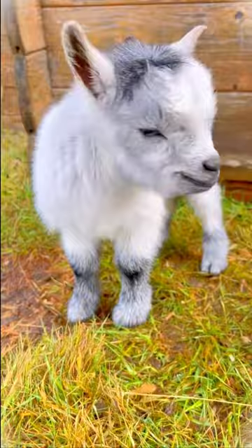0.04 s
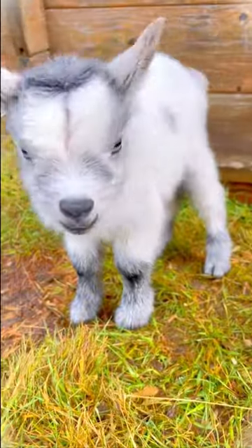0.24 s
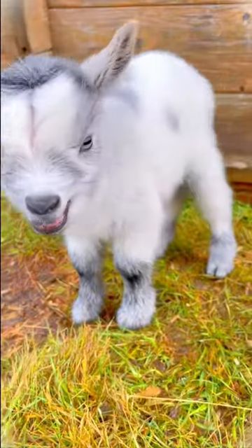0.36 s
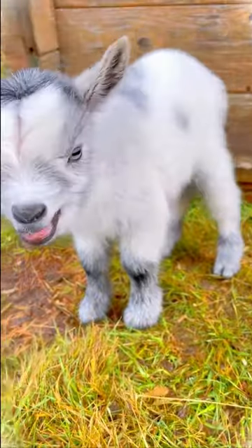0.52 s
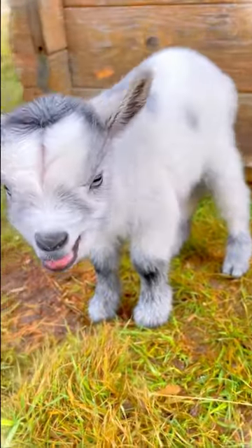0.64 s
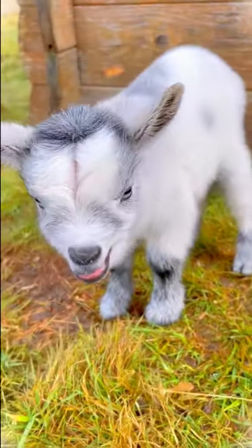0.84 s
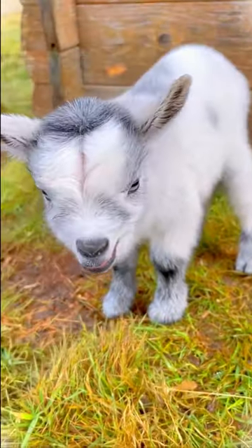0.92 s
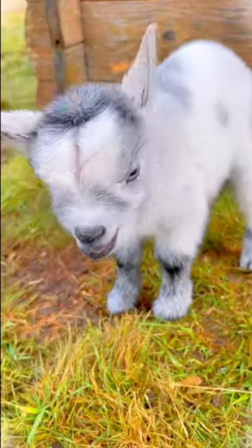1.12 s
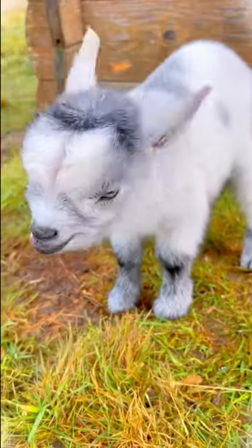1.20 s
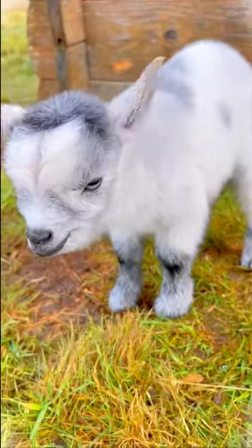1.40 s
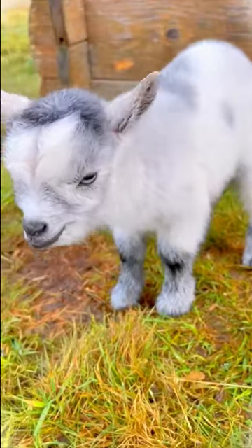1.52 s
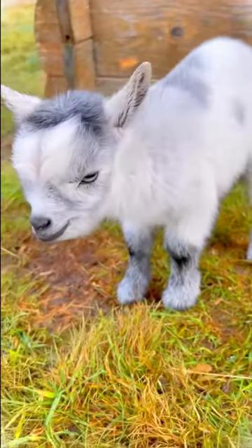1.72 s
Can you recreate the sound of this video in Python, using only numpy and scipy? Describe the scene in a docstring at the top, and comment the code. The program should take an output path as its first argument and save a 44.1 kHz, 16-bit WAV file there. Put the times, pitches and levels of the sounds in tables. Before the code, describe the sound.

A goat kid bleats once, close to the microphone outdoors, a high, raspy note that wavers four times. Light wind buffets the microphone over a faint hiss, then eases, and three soft rustles follow.

```python
"""A goat kid bleats once, close to a phone outdoors.
After a moment of silence, light wind buffets the microphone over a faint hiss.
From 0.43 to 0.96 s the kid's vocal folds pulse out one high, raspy note that throbs four times:
each throb is a clear stack of harmonics that sags in pitch; between throbs the voice breaks into rasp.
The wind then eases, and from 1.5 s come three light rustles, probably of grass underfoot."""
import sys
import numpy as np
from scipy import signal
from scipy.fft import rfft, irfft
from scipy.io import wavfile
from scipy.ndimage import uniform_filter1d

SR = 44100
rng = np.random.default_rng(int(sys.argv[2]) if len(sys.argv) > 2 else 0)


def dump(signal):
    """Clip the signal to [-1, 1] and save it as 16-bit WAV at the path in sys.argv[1]."""
    limited = np.clip(np.atleast_2d(signal).T, -1, 1)
    pcm = np.round(limited * 32767).astype(np.int16)
    wavfile.write(sys.argv[1], SR, pcm)


N = 77175
BINS_HZ = np.fft.rfftfreq(N, 1 / SR)
SIDES = np.array([[1], [-1]])  # left, right


def undb(db):
    """Decibels to gain."""
    return 10 ** (np.asarray(db) / 20)


def unit(x):
    """Scale to rms 1."""
    return x / np.sqrt(np.mean(x ** 2))


def curve(rows):
    """Join (t/s, value) points with straight lines."""
    return np.interp(np.arange(N) / SR, *np.array(rows, float).T)


def colour_at(rows, hz):
    """Gain of a (f/Hz, level/dB) colour at hz."""
    f, db = np.array(rows, float).T
    return undb(np.interp(np.log(np.maximum(hz, 1)), np.log(f), db))


def tint(x, rows):
    """Filter by a colour, to rms 1."""
    return unit(irfft(rfft(x) * colour_at(rows, BINS_HZ), N))


def walk(per_s):
    """Smooth random drift, about per_s turns a second, rms 1."""
    k = max(int(SR / per_s), 2)
    return unit(uniform_filter1d(uniform_filter1d(rng.standard_normal(N), k), k))


def noise_in(modes):
    """Noise ringing in (f/Hz, half width/Hz, level/dB) resonances, rms 1."""
    gain = sum(undb(db) * np.exp(-.5 * ((BINS_HZ - hz) / width) ** 2) for hz, width, db in modes)
    return unit(irfft(rfft(rng.standard_normal(N)) * gain, N))


def bursts(t, rows):
    """Short swells of noise, each in one resonance."""
    return sum(noise_in([(hz, width_hz, 0)]) * undb(db) * np.exp(-((t - at_s) / half_s) ** 2)
               for at_s, half_s, db, hz, width_hz in rows)


# hiss spectrum: f/Hz, level/dB
AIR_COLOUR = [(350, -16), (600, 1), (1200, -4), (1440, -4.5), (2060, -0.5), (2740, -6.5), (3730, -2.5),
              (5280, -13), (8610, -31.5), (10000, -20.5), (13000, -41)]
# hiss swell: t/s, level/dB re AIR_DB
AIR_SWELL = [(.07, -0.5), (.4, -3.5), (1.05, -3.5), (1.3, -5.5), (1.46, -7), (1.52, -2.5), (1.62, -4.5),
             (1.75, -3)]
AIR_DB = -61.5


def air():
    """Faint, wide outdoor hiss."""
    mid, side = (tint(rng.standard_normal(N), AIR_COLOUR) for _ in range(2))
    return undb(AIR_DB + curve(AIR_SWELL) + .85 * walk(7)) * (mid + undb(-.5) * side * SIDES)


# rustles: t/s, half length/s, level/dB, f/Hz, half width/Hz
RUSTLES = [(1.5, 0.017, -66, 2000, 500), (1.545, .025, -66.5, 4130, 700), (1.62, 0.024, -70, 3970, 400)]
GRAIN_DB, GRAINS_PER_S = 4, 240


def rustle(t):
    """Grainy rustles, different at each microphone port."""
    return np.array([bursts(t, RUSTLES) * undb(GRAIN_DB * walk(GRAINS_PER_S)) for _ in range(2)])


# wind envelopes: t/s, level/dB
RUMBLE_LEVEL = [(.07, -36.5), (.25, -32), (.38, -30), (.55, -33), (.89, -34.5), (.945, -42.5), (.99, -36),
                (1.15, -34), (1.24, -46.5), (1.37, -42), (1.5, -46.5), (1.66, -40.5), (1.75, -47)]
FLUTTER_LEVEL = [(.07, -36), (.22, -41.5), (.34, -50), (.45, -42), (.6, -34.5), (.7, -44), (.9, -46),
                 (1.02, -51.5), (1.2, -53), (1.4, -69), (1.52, -53.5), (1.75, -76)]
# wind spectra: f/Hz, level/dB
RUMBLE_COLOUR = [(20, -44.5), (40, -29.5), (62, -1.5), (100, 2), (135, -3), (200, -13), (320, -29.5),
                 (500, -34.5), (800, -55.5), (1500, -78), (5000, -100)]
FLUTTER_COLOUR = [(100, -23), (190, 5), (300, 1), (500, -11), (800, -24.5), (1500, -55), (5000, -96)]
# buffets: t/s, level/dB, f/Hz, half length/s
BUFFETS = [(0.087, -22.5, 81.3, 0.015), (0.117, -30.5, 454, 0.0022), (0.183, -23, 231, 0.0073),
           (0.21, -20, 123.7, 0.011), (.224, -29, 242, 0.0081), (0.272, -24.5, 114, .012),
           (0.592, -23, 456, 0.0042), (0.647, -28.5, 340, 0.0067), (0.817, -20, 111, 0.013),
           (0.988, -20.5, 125, 0.012), (1.1, -23.5, 114, 0.0098), (1.353, -30.5, 99, 0.017),
           (1.404, -31.5, 78.3, 0.01), (1.623, -35, 110, 0.0068), (1.691, -33, 101.3, 0.011)]
LOW_CUT_HZ = 42


def wind(t):
    """Wind on the microphone: uneven rumble, higher flutter and short buffets, in mono."""
    rumble = tint(rng.standard_normal(N) * undb(.53 * walk(30)), RUMBLE_COLOUR)
    flutter = tint(rng.standard_normal(N) * undb(4 * walk(50)), FLUTTER_COLOUR)
    pressure = rumble * undb(curve(RUMBLE_LEVEL)) + flutter * undb(curve(FLUTTER_LEVEL))
    for at_s, db, hz, half_s in BUFFETS:
        envelope = undb(db) * np.exp(-((t - at_s) / half_s) ** 2)
        pressure += envelope * np.sin(2 * np.pi * hz * (t - at_s) + .89 * walk(hz))
    return signal.sosfilt(signal.butter(4, LOW_CUT_HZ, "highpass", fs=SR, output="sos"), pressure)


def scatter(x, t, t60_s):
    """Diffuse stereo reflections, decaying exponentially."""
    tail = rng.standard_normal((2, N)) * np.exp(-np.log(1000) * t / t60_s) * (t > .002)
    tail /= np.sqrt(np.sum(tail ** 2, axis=1, keepdims=True))
    return signal.fftconvolve(x, tail, axes=1)[:, :N]


# phase lead of the left channel: f/Hz, phase/rad
PORT_LEAD = [(400, -1), (800, 1), (1500, -1.26), (2200, 1.08), (3100, 1), (3800, 1), (4500, 4), (5300, 4.5),
             (6000, 8), (6800, 7), (7600, 8), (8500, 10.5), (9200, 11.5), (9900, 7), (10800, 9),
             (11500, 6.5)]
ECHO_DB, ECHO_T60_S = -9.5, .12
YARD_DB, YARD_T60_S = -52.5, .5


def yard(x, t):
    """Left and right differ in phase, by an amount that changes with frequency; ground and shed scatter the
    sound, the yard adds a faint tail."""
    lead_rad = np.interp(BINS_HZ, *np.array(PORT_LEAD).T)
    direct = irfft(rfft(x) * np.exp(.5j * lead_rad * SIDES), N)
    return direct + undb(ECHO_DB) * scatter(x, t, ECHO_T60_S) + undb(YARD_DB) * scatter(x, t, YARD_T60_S)


# high tone envelope: t/s, level/dB
HIGH_TONE_LEVEL = [(.44, -84.5), (.47, -32), (.53, -40), (.6, -35.5), (.65, -49), (.74, -37.5), (.79, -45),
                   (.86, -35), (.92, -34.5), (.935, -92)]
HIGH_TONE_HZ = 11542


def high_tone(t):
    """Thin tone of steady pitch that sounds with the bleat."""
    return np.sqrt(2) * undb(curve(HIGH_TONE_LEVEL)) * np.sin(2 * np.pi * HIGH_TONE_HZ * t + .13 * walk(40))


# croaks: t/s, half length/s, level/dB, f/Hz, half width/Hz
CROAKS = [(.444, .011, -38, 1460, 394.2), (0.457, .013, -34, 4190, 1300), (0.754, .027, -51.5, 1216, 74.07),
          (.755, 0.035, -42.5, 2000, 110), (.913, .02, -47, 1366, 251), (0.903, 0.03, -40, 2163, 220)]


def croaks(t):
    """Bursts of noise where the folds lose their pitch."""
    return bursts(t, CROAKS)


# shrill envelope: t/s, level/dB
SHRILL_LEVEL = [(.425, -64.5), (.445, -38), (.475, -27.5), (.53, -42.5), (.57, -35), (.64, -35.5),
                (.69, -27.5), (.76, -28), (.795, -32.5), (.835, -27), (.9, -34), (.935, -46.5),
                (.975, -62.5)]
# shrill resonances: f/Hz, half width/Hz, level/dB
SHRILL_MODES = [(9700, 110, -5), (9984, 21, 3), (10160, 40, -8), (10740, 230, -10)]
RASP_SIDE_DB = -5


def shrill():
    """Piercing rasp in resonances near 10 kHz that holds on between throbs."""
    mid, side = noise_in(SHRILL_MODES), noise_in(SHRILL_MODES)
    return (mid + undb(RASP_SIDE_DB) * side * SIDES) * undb(curve(SHRILL_LEVEL))


# throat rasp envelope, shared with voice(): t/s, level/dB
RASP_LEVEL = [(.425, -76), (.443, -29.5), (.47, -15), (.53, -28.5), (.585, -24), (.65, -33.5), (.705, -22),
              (.775, -33), (.84, -24.5), (.91, -35.5), (.94, -50), (.975, -79.5)]
# its spectrum: f/Hz, level/dB
RASP_COLOUR = [(750, -9.5), (1450, 2.5), (2200, 5), (3000, -1), (3800, 1.5), (4500, 2.5), (5300, 2),
               (6100, 0.5), (6900, 4), (8000, -1.5), (8800, 3), (9300, -16.5), (9900, 2.5), (10800, 0),
               (11400, -13.5), (12300, -14.5), (13200, -42)]
CHOP_DEPTH, BREATH_DB = .69, -31


def turbulence(phase):
    """Broad hiss in the throat, chopped once per cycle of the folds."""
    puffs = rng.standard_normal(N) * (1 + CHOP_DEPTH * np.cos(phase))
    return tint(puffs, RASP_COLOUR) * undb(curve(RASP_LEVEL) + BREATH_DB)


SKIRT_HZ, ROUGH_REF_HZ = 110, 2570


def skirt(centre_hz):
    """Narrow complex noise that roughens one harmonic, wider for the high ones."""
    offset_hz = np.fft.fftfreq(N, 1 / SR)
    spread_hz = SKIRT_HZ * np.sqrt(max(centre_hz / ROUGH_REF_HZ, .5))
    white = rng.standard_normal(N) + 1j * rng.standard_normal(N)
    noise = np.fft.ifft(white * np.exp(-(offset_hz / spread_hz) ** 2 / 2))
    return noise / np.std(noise)


# passing dips: t/s, half length/s, f/Hz, half width/Hz, level/dB
HOLLOWS = [(0.69, 0.06, 4550, 210, -27.5), (.915, 0.058, 4600, 380, -37.5), (.705, 0.038, 8450, 1200, -25),
           (1, 0.17, 5800, 99, -24), (.92, 0.029, 1000, 270, -20.5), (0.7, .02, 680, 330, -9.5)]


def hollows(t, hz):
    """Gain at hz of the dips that come and go in the voice's colour."""
    return undb(sum(db * np.exp(-((t - at_s) / half_s) ** 2 - ((hz - centre_hz) / width_hz) ** 2)
                    for at_s, half_s, centre_hz, width_hz, db in HOLLOWS))


# throbs: t/s, level/dB, rise/s, fall/s, mouth f/Hz, treble level/dB, upper f/Hz, upper level/dB
THROBS = [(0.466, -15.5, 0.011, 0.022, 1643, 1, 9000, 4), (.587, -12.5, 0.013, 0.013, 2225, -2.5, 6800, 3),
          (.704, -12.5, 0.015, 0.016, 2214, -2.5, 6900, 0.5), (.834, -23, 0.023, .024, 2300, 0, 5313, 3.5)]
# voiced spectrum: f/Hz, level/dB
TONE_COLOUR = [(750, -8.5), (1500, -3), (2250, -1.5), (3000, -11), (3800, -7), (4500, -3), (5300, -5.5),
               (6000, -6), (6750, -4.5), (7500, -2), (8500, -4), (9300, -17.5), (10000, -3.5), (10800, 0.5),
               (11500, -16), (12400, -28.5), (13200, -50.5)]
THROB_SHAPE, TONE_FLOOR_DB, CLEARING_DB = 1.9, -24, -11
MOUTH_DB, MOUTH_WIDTH_HZ, UPPER_WIDTH_HZ = 8, 180, 400
CREAK_HZ, CREAK_DEPTH, CREAK_DRIFT = 130, .32, .1
FLICKER_DB, FLICKER_PER_S = 1.6, 130
SCATTER_RAD, WANDER_RAD = .9, .1
HEAD_MOTION_RAD, HEAD_MOTION_PER_S = .033, 17


def voice(t, phase, pitch_hz):
    """Vocal fold pulses as 17 harmonics; their rough skirts of noise clear up at each throb."""
    swell = sum(undb(db) * np.exp(-.5 * np.abs((t - at) / np.where(t < at, rise, fall)) ** THROB_SHAPE)
                for at, db, rise, fall, *_ in THROBS)
    mouth_hz, treble_db, upper_hz, upper_db = (
        curve([(row[0], row[column]) for row in THROBS]) for column in range(4, 8))
    # slower flapping in the throat splits each harmonic into strands
    creak = 2 * np.pi * np.cumsum(CREAK_HZ * (1 + CREAK_DRIFT * walk(40))) / SR
    tone, rasp_mid, rasp_side = 0, 0, 0
    for k in range(1, 18):
        hz = k * pitch_hz
        roughness = hz / ROUGH_REF_HZ
        partial = hollows(t, hz) * np.exp(1j * (k * phase + SCATTER_RAD * rng.standard_normal()))
        db = MOUTH_DB / (1 + ((hz - mouth_hz) / MOUTH_WIDTH_HZ) ** 2)
        db += upper_db / (1 + ((hz - upper_hz) / UPPER_WIDTH_HZ) ** 2)
        db += treble_db * np.clip((hz - 2300) / 2000, 0, 1)
        db += FLICKER_DB * walk(FLICKER_PER_S)
        strands = 1 + CREAK_DEPTH * np.minimum(roughness, 1) * np.cos(creak + rng.uniform(0, 2 * np.pi))
        wander_rad = WANDER_RAD * roughness * walk(FLICKER_PER_S)
        head_rad = HEAD_MOTION_RAD * walk(HEAD_MOTION_PER_S) * SIDES
        harmonic = np.real(partial * np.exp(1j * (wander_rad + head_rad)))
        tone += colour_at(TONE_COLOUR, hz) * undb(db) * strands * harmonic
        noise = skirt(hz.mean())
        carrier = partial * colour_at(RASP_COLOUR, hz)
        rasp_mid += np.real(carrier * noise)
        rasp_side += np.real(carrier * noise[::-1])
    rasp = unit(rasp_mid) + undb(RASP_SIDE_DB) * unit(rasp_side) * SIDES
    rasp_db = curve(RASP_LEVEL)
    clarity = swell / (swell + undb(rasp_db))
    rasp *= undb(rasp_db + CLEARING_DB * clarity + 1.53 * walk(140))
    return unit(tone) * (swell + undb(rasp_db + TONE_FLOOR_DB)) + rasp


# fixed dips and narrow peaks in the bleat's colour: f/Hz, half width/Hz, level/dB
DIPS = [(1060, 120, -28), (1790, 90, -13), (2660, 130, -26), (3350, 100, -7), (4170, 120, -18),
        (4920, 130, -13), (9300, 220, -14), (11250, 130, -12)]
PEAKS = [(5290, 45, 5.5), (6810, 120, 7), (6730, 13, 3), (6900, 30, 4.5), (7730, 120, 4.5), (8360, 140, 3),
         (8737, 51, 6)]


def bleat_colour(x):
    """Steady dips, and narrow peaks that ring as harmonics slide through them."""
    gain_db = sum(db * np.exp(-((BINS_HZ - hz) / width_hz) ** 2) for hz, width_hz, db in DIPS + PEAKS)
    return irfft(rfft(x) * undb(gain_db), N)


# pitch of the folds, sagging through each throb: t/s, f/Hz
PITCH = [(.44, 900), (.454, 825), (.47, 770), (.494, 716), (.532, 672), (.543, 778), (.56, 776),
         (.585, 748), (.605, 742), (.648, 692), (.66, 772), (.68, 774), (.7, 742), (.716, 713), (.738, 719),
         (.766, 702), (.782, 800), (.8, 820), (.818, 788), (.838, 754), (.856, 755), (.888, 785),
         (.94, 770)]
JITTER, JITTER_PER_S, WOBBLE, WOBBLE_PER_S = .003, 400, .007, 90
OPEN_S, OPEN_RISE_S, SHUT_S, SHUT_FALL_S = .428, .012, .955, .03


def goat(t):
    """The throat opens on voice, turbulence and shrill rasp; croaks and a thin high tone sound too."""
    pitch_hz = curve(PITCH)
    unsteady_hz = pitch_hz * (1 + JITTER * walk(JITTER_PER_S) + WOBBLE * walk(WOBBLE_PER_S))
    phase = 2 * np.pi * np.cumsum(unsteady_hz) / SR
    gate = np.clip((t - OPEN_S) / OPEN_RISE_S, 0, 1) * np.clip((SHUT_S - t) / SHUT_FALL_S, 0, 1)
    layers = high_tone(t) + voice(t, phase, pitch_hz) + turbulence(phase) + shrill()
    return bleat_colour(layers * gate) + croaks(t)


def scene():
    """Goat, wind, rustles and air at the phone."""
    t = np.arange(N) / SR
    return yard(goat(t), t) + wind(t) + rustle(t) + air()


START_S, FADE_S, CEILING, TOP_HZ = .068, .003, .9, 13275


def record(dry):
    """Round the highest peaks, open after a moment of silence, cut the top."""
    rounded = dry / (1 + (dry / CEILING) ** 4) ** .25
    fade_in = np.clip((np.arange(N) / SR - START_S) / FADE_S, 0, 1)
    return signal.sosfilt(signal.ellip(8, .2, 70, TOP_HZ, fs=SR, output="sos"), rounded * fade_in)


dry = scene()
out = record(dry)
dump(out)
```